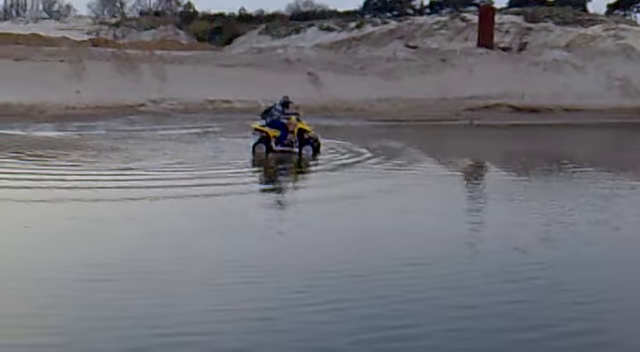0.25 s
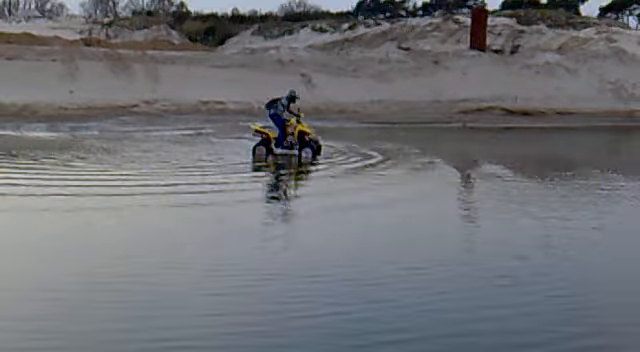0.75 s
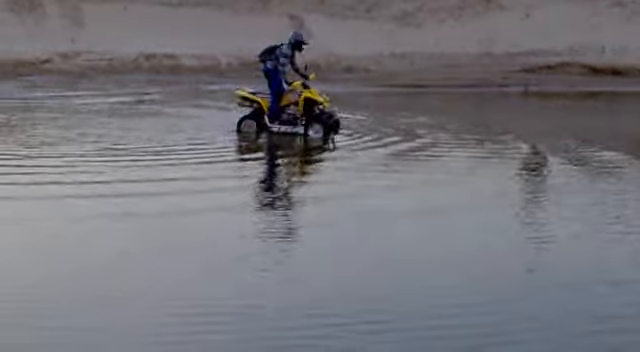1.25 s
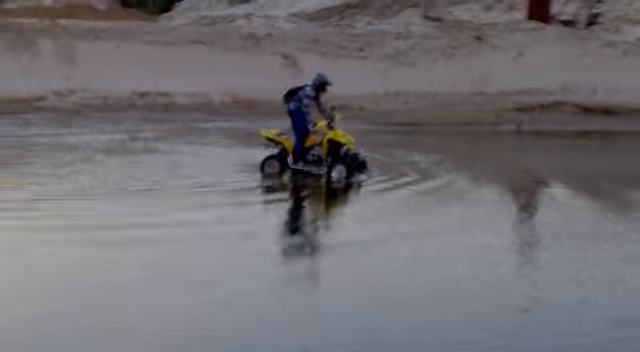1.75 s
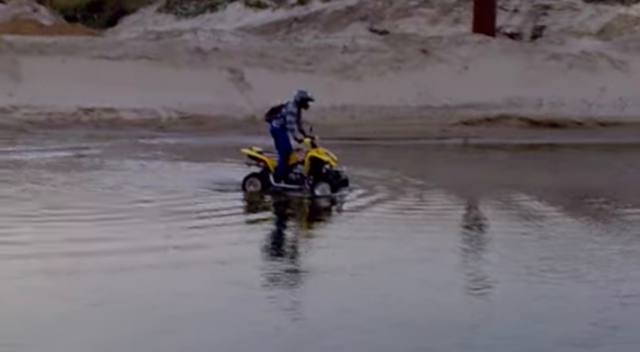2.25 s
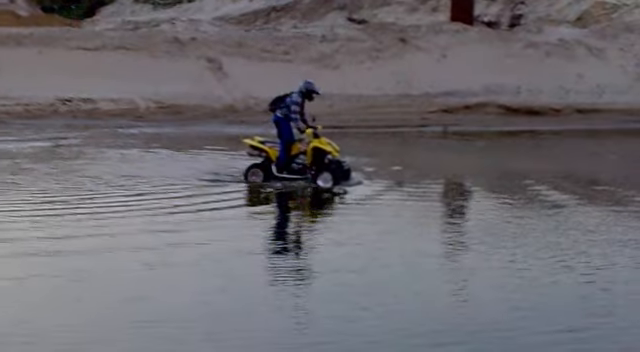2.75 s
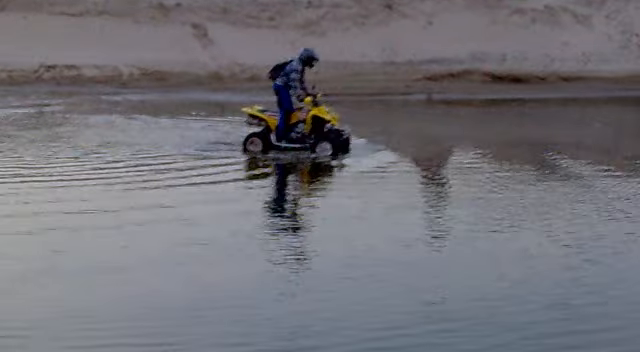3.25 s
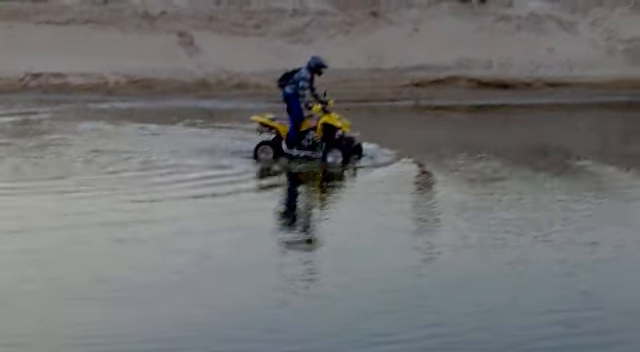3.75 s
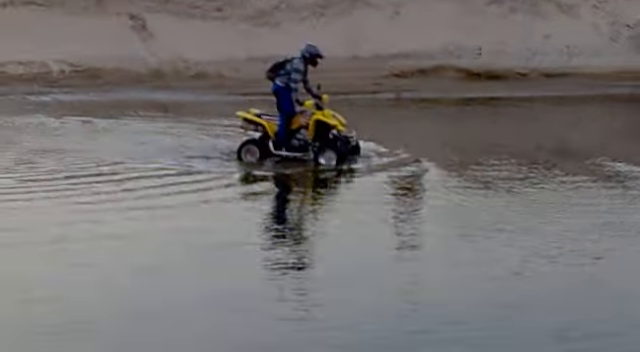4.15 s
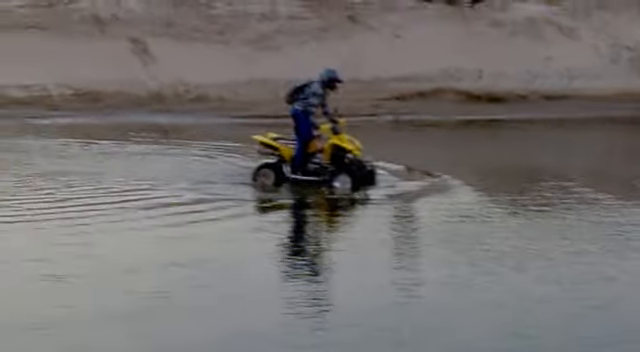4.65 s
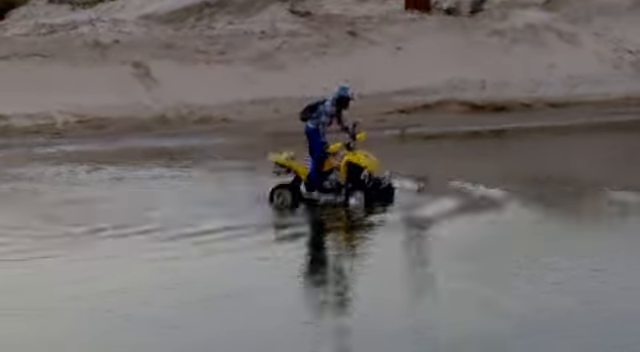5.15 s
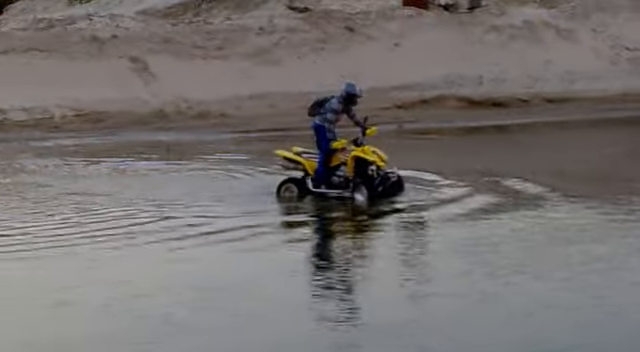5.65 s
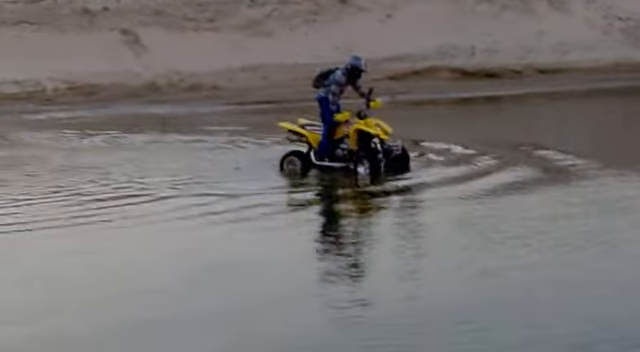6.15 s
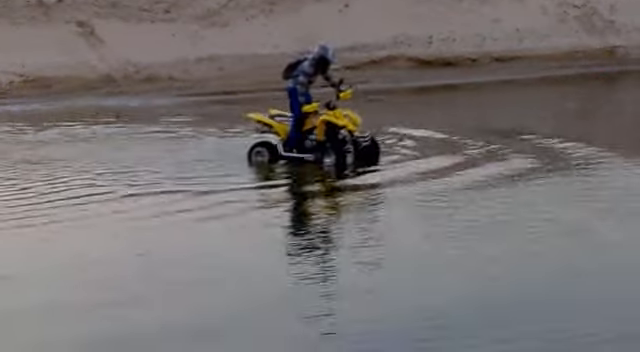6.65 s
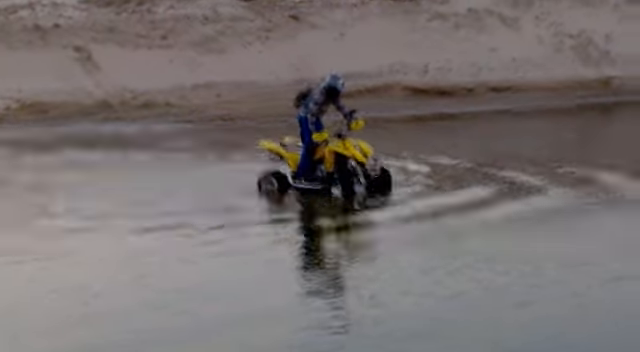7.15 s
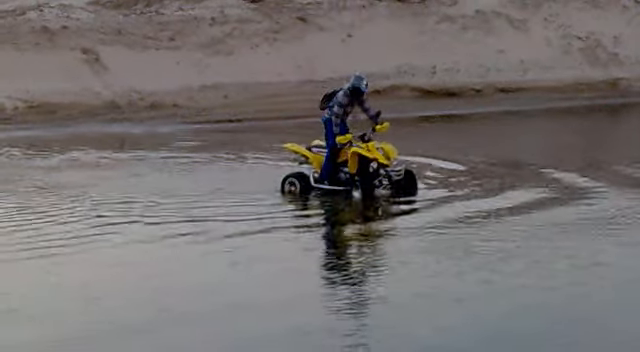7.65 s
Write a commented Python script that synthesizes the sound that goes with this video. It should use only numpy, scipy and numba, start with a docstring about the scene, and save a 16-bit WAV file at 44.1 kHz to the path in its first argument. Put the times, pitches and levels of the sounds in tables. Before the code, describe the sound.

Throaty single-cylinder engine blips swell and fall back to a chugging idle at some distance outdoors, over steady hiss and late overloaded wind buffets.

```python
"""Quad bike in a shallow pond

A single-cylinder four-stroke quad bike idles and blips its throttle some way off across the water.
Each exhaust stroke excites damped modes of the pipe and silencer; shaped noise gives gas and rattle.
Two gliding tones make a small bird; brief pulses are handling ticks and one puff of exhaust gas.
Crackling noise is a rustle close by; steady noise is the hiss of the microphone.
A breeze rumbles on the handheld microphone as low noise; damped swings are the buffets that overload it."""
import sys
import numpy as np
from scipy import signal
from scipy.fft import rfft, irfft
from scipy.io import wavfile
from scipy.ndimage import uniform_filter1d, map_coordinates
from numba import njit

SR = 44100
rng = np.random.default_rng(int(sys.argv[2]) if len(sys.argv) > 2 else 0)


def wav_record(signal):
    """Record a signal, one row per channel, as 16-bit PCM in the file named by sys.argv[1]."""
    frames = np.transpose(np.atleast_2d(signal))
    bounded = np.clip(frames, -1, 1)
    # unit amplitude maps onto the largest positive 16-bit level
    quanta = np.round(bounded * 32767).astype(np.int16)
    wavfile.write(sys.argv[1], SR, quanta)


def invert_db(level):
    """Linear amplitude ratio for a level in decibels (20 dB per decade), elementwise."""
    return 10 ** (np.asarray(level, dtype=float) / 20)


N = 347508
TIME = np.arange(N) / SR

# steady background hiss of the microphone: (frequency [Hz], relative density [dB])
HISS_SPECTRUM = [(290, -33), (500, -2.5), (648, -2.5), (793, -3.5), (1030, -1.5), (1170, -1.5),
                 (1850, -2.5), (3540, -9.5), (8160, -25), (15600, -22.5)]
# breeze flutter on the microphone: (frequency [Hz], relative density [dB])
FLUTTER_SPECTRUM = [(12, -35), (25, -52), (70, -5.5), (143, 0.5), (210, -9.5), (400, -17.5), (700, -39),
                    (1500, -115)]
# gusts of the breeze: (peak time [s], level [dB], dying time [s])
GUSTS = [(.4, -41, 0.61), (.92, -32.5, 0.088), (1.2, -42, 0.33), (1.85, -30.5, 0.055), (3.4, -39, 0.25),
         (3.7, -42, 0.25), (5.2, -39, 0.058), (5.64, -36, 0.033), (6.04, -46, 0.11), (6.6, -44, 0.091),
         (7.02, -32, 0.071), (7.201, -22.5, 0.27), (7.36, -31.5, 0.073), (7.64, -26, 0.034),
         (7.87, -42, .1)]
# buffets on the membrane: (time [s], strength [dB], swing frequency [Hz])
BUFFETS = [(7.1923, -13.5, 116), (7.2043, -1, 114), (7.212, -7.5, 262), (7.243, -18, 128),
           (7.2672, -3.5, 141), (7.324, -10, 81.4), (7.378, -6.5, 197), (7.389, -4, 108), (7.464, -22, 134),
           (7.5403, -14.5, 113), (7.592, -11.5, 89), (7.6052, -5.5, 120.5), (7.622, -4, 77),
           (7.684, -19, 110)]
# handling ticks, and at 4.24 s a short puff of exhaust gas:
# (time [s], envelope peak [dB], frequency [Hz], decay [s])
TICKS_AND_PUFF = [(1.0105, -21, 1650, 0.00051), (4.2398, -31.5, 2540, 0.0031), (4.888, -25.5, 1610, 0.0015),
                  (4.8914, -30, 890, 0.0013), (4.8931, -18, 2870, 0.00026), (5.669, -34, 6500, .00015),
                  (5.695, -38, 7500, .00015), (6.3875, -38, 6450, 0.00022)]
# a short rustle close by: (time [s], level [dB])
RUSTLE = [(5.6, -93), (5.636, -42), (5.728, -64), (5.74, -80)]
# bird whistles: (time [s], length [s], from [Hz], to [Hz], mean level [dB])
CHIRPS = [(6.258, .042, 6800, 3600, -57), (6.39, .04, 4300, 5600, -59)]
# engine speed: (time [s], firing rate [Hz])
SPEED = [(0.0, 4.292), (0.23, 15.589), (0.49, 19.421), (1.13, 21.76), (1.77, 16.327), (2.22, 14.773),
         (2.42, 8.298), (2.5, 12.259), (2.59, 10.534), (3.16, 13.07), (3.34, 21.281), (3.76, 23.98),
         (3.94, 22.669), (4.44, 11.644), (4.94, 13.652), (5.09, 14.042), (5.52, 11.558), (5.73, 14.025),
         (6.66, 13.469), (7.88, 13.467)]
# engine load: (time [s], blowdown strength [dB], piston sweep trim against it [dB])
LOAD = [(0.01, -31, -8), (0.1, -34, -1), (0.32, -21.5, -2), (0.55, -25, 1), (0.94, -27, 0),
        (1.5, -25.5, -2), (1.9, -25, -3.5), (2.19, -28.5, -3), (2.4, -32, -2), (3.05, -30, 7),
        (3.28, -20, -7), (3.65, -24, -12), (3.98, -27.5, -7), (4.06, -27, 0.5), (4.2, -30, -14),
        (4.45, -35, 8), (4.65, -28.5, 5), (5.38, -28, -0.5), (6.2, -26.5, -0.5), (6.5, -28, 0),
        (7.1, -26.5, 5), (7.3, -28.5, 5), (7.88, -29, -1)]
# pipe and silencer modes at idle: (frequency [Hz], 60 dB decay [s], relative level [dB], polarity [signed])
PIPE_MODES = [(56.1, 0.055, 39, 0.85), (115.2, 0.097, 34.5, -0.86), (181.3, 0.056, 19.5, -1.08),
              (267.2, 0.062, 23, -0.83), (368, 0.029, 9, -0.51), (452, 0.044, 14.5, -0.71),
              (640, 0.042, 0, -1.1), (970, .04, 0, -1.2)]
# gas noise: (frequency [Hz], relative density [dB])
GAS_SPECTRUM = [(650, -46), (1100, -9.5), (1410, -10.5), (1860, 3.5), (2260, 0.5), (2670, -4), (2870, -2.5),
                (4320, -7), (10000, -30), (13000, -63), (22000, -120)]
# engine case and silencer shell resonances: (frequency [Hz], width [Hz], relative level [dB])
SHELL_MODES = [(990, 60, 2), (1380, 300, -7.5), (1887, 49, 2), (2800, 26, -6), (3474, 210, -2),
               (5640, 160, -11.5)]
# tail pipe resonances excited by the rushing gas: (frequency [Hz], width [Hz], relative level [dB])
THROAT_MODES = [(652, 160, -7), (890, 74, -4.5), (968, 130, -4), (1500, 440, -13), (2210, 130, -8.5)]
# silencer panel ring, before the rush adds to it: (time [s], level [dB])
PANEL_LEVEL = [(0, -57), (.5, -43), (1.2, -50), (1.8, -56), (2.9, -53.5), (3.8, -54), (5.3, -60),
               (6.3, -64), (6.7, -56.5), (7.25, -44.5), (7.88, -55)]

IDLE_HZ = 14  # firings per second


def curve(table, column=1):
    """Linear interpolation: one column of a table over time."""
    rows = np.array(table, float)
    return np.interp(TIME, rows[:, 0], rows[:, column])


def unit(x):
    """Normalisation: scale to an rms of 1."""
    return x / np.sqrt(np.mean(x ** 2))


def coloured(points, peaks=()):
    """Spectral shaping: white noise weighted by a density curve plus resonance peaks, at rms 1."""
    hz = np.maximum(np.fft.rfftfreq(N, 1 / SR), 1)
    rows = np.array(points, float)
    power = invert_db(np.interp(np.log(hz), np.log(rows[:, 0]), rows[:, 1])) ** 2
    for centre, width, db in peaks:
        power = power + invert_db(db) ** 2 / (1 + (2 * (hz - centre) / width) ** 2) ** 2
    return unit(irfft(rfft(rng.standard_normal(N)) * np.sqrt(power), N))


def walk(rate):
    """Slow random modulation: levels held 1 / rate s, smoothed twice, at rms 1."""
    hold = int(SR / rate)
    steps = np.repeat(rng.standard_normal(N // hold + 1), hold)
    return unit(uniform_filter1d(uniform_filter1d(steps, hold), hold)[:N])


@njit
def ring(x, hz, keep):
    """Damped resonance: a decaying rotating phasor driven by x, whose pitch may move."""
    y, z = np.empty(len(x)), 0j
    for i in range(len(x)):
        z = z * keep * np.exp(2j * np.pi * hz[i] / SR) + x[i]
        y[i] = (1 - keep) * z.imag
    return y


def microphone_hiss():
    """Stationary broadband noise: the steady background hiss of the microphone at -50 dB rms."""
    return invert_db(-50) * coloured(HISS_SPECTRUM)


def breeze_db():
    """Gust envelope: each gust rises fast and dies exponentially over a constant calm level, in dB."""
    calm_db, rise_s = -44, 0.025
    total = invert_db(calm_db)
    for s, db, dying_s in GUSTS:
        decay = np.where(TIME < s, (s - TIME) / rise_s, (TIME - s) / dying_s)
        total = total + invert_db(db) * np.exp(-decay)
    return 20 * np.log10(total)


def wind():
    """Turbulence on a microphone: deep rumble, with flutter and hiss that grow faster than the gusts."""
    deep = coloured([(12, -36), (30, 4.5), (50, 10.5), (85, -6.5), (200, -52)])
    flutter = unit(coloured(FLUTTER_SPECTRUM) * invert_db(2 * walk(35)))
    hiss = invert_db(-36) * coloured([(1000, -14), (4000, 46), (8000, -36), (16000, -32)])
    rumble = deep * invert_db(1.8 * walk(4.16) + breeze_db())
    return rumble + (flutter + hiss) * invert_db(1.314 * breeze_db() + 11)


def buffets():
    """Membrane displacement: a buffet sucks it out, snaps it in and leaves it in damped swings."""
    suck_s, snap_rad, snap_s = 0.0013, 0.71, 0.00083
    swings_to_60_db = 5.6
    out = 0
    for s, db, hz in BUFFETS:
        t = TIME - s
        suck = np.exp(np.minimum(t, 0) / suck_s)
        swing_decay = invert_db(-60 * np.maximum(t, 0) * hz / swings_to_60_db)
        fade = np.where(t < 0, suck, swing_decay)
        # stronger buffets snap further, up to a limit
        snap = snap_rad * min(invert_db(db + 7), 1) * np.tanh(t / snap_s)
        out = out + invert_db(db) * fade * np.sin(2 * np.pi * hz * t + snap)
    return out


def rustle():
    """Amplitude-modulated noise: fast level changes make it crackle close to the microphone."""
    heard = (TIME > RUSTLE[0][0]) & (TIME < RUSTLE[-1][0])
    noise = coloured([(3000, -17), (5500, -18), (8000, -17), (10500, -30)])
    return heard * invert_db(curve(RUSTLE)) * unit(noise * invert_db(1.6 * walk(250)))


def ticks_and_puff():
    """Impulsive excitation: a pulse of tone and noise for each handling tick and the exhaust puff."""
    out = 0
    for s, db, hz, decay in TICKS_AND_PUFF:
        t = np.maximum(TIME - s, 0)
        pulse = t / decay * np.exp(1 - t / decay)
        noise = coloured([(hz / 3, -14), (hz, 0), (hz * 2.5, -20), (SR / 2, -60)])
        out = out + invert_db(db) * pulse * (0.77 * np.sin(2 * np.pi * hz * t) + 0.64 * noise)
    return out


def bird():
    """Linear frequency glide: two thin whistles whose phase is the integral of a moving pitch."""
    out = 0
    for s, length, hz_from, hz_to, db in CHIRPS:
        part = np.clip((TIME - s) / length, 0, 1)
        turns = length * (hz_from * part + (hz_to - hz_from) * part ** 2 / 2)
        out = out + invert_db(db + 7.6 * walk(340)) * np.sin(np.pi * part) * np.sin(2 * np.pi * turns)
    return out


def bank_return(bike):
    """Diffuse reflection: the sand banks send the engine back late and faint, as decaying noise taps."""
    t = TIME[:SR // 4]
    tail = rng.standard_normal(SR // 4) * invert_db(-60 * t / 0.11) * (t > .02)
    return invert_db(-18) * signal.fftconvolve(bike, tail / np.linalg.norm(tail))[:N]


def firing_cycle(hz):
    """Phase integration: share of the cycle, seconds since the valve opened, chance draws per cycle."""
    start_cycle, valve_lag_s = .3764, .0016
    cycles = start_cycle + np.cumsum(hz) / SR - hz * valve_lag_s
    count, share = cycles.astype(int), cycles % 1
    chance = rng.standard_normal((count.max() + 1, 3))[count].T
    return share, share / hz, chance


def exhaust_flow(hz, share, since, chance):
    """Gas discharge: the valve opens to a sharp blowdown, then the piston sweeps the rest out."""
    blow_s, outlet_hz, scatter_db = .0006, 124, 1.2
    # the valve snaps open a little faster at speed
    opening = since / blow_s * (hz / IDLE_HZ) ** .25
    blowdown = opening * np.exp(1 - opening)
    # the sweep takes a fixed part of the cycle and pushes harder at speed
    stroke = np.clip((share - .143) / .284, 0, 1)
    push = .193 * (hz / IDLE_HZ) ** 2.48 * (1 + .08 * chance[1]) * invert_db(curve(LOAD, column=2))
    sweep = push * np.sin(np.pi * stroke ** .396) ** 4
    flow = invert_db(curve(LOAD) + scatter_db * chance[0]) * (blowdown + sweep)
    # a small outlet radiates little bass
    return signal.sosfilt(signal.butter(2, outlet_hz, "high", fs=SR, output="sos"), flow)


def pipe_ring(flow, hz):
    """Pipe resonance and wave steepening: the flow rings every mode, and crests outrun troughs."""
    steepen_ms = 2.0  # advance per unit of pressure
    # hotter gas carries sound faster and lifts every mode
    warm = (hz / IDLE_HZ) ** .12
    pipe = 0
    for mode_hz, t60, db, sign in PIPE_MODES:
        keep = np.exp(-np.log(1000) / (t60 * SR))
        pipe = pipe + sign * invert_db(db) * ring(flow, mode_hz * warm, keep)
    return map_coordinates(pipe, [np.arange(N) + steepen_ms * SR / 1000 * pipe], order=1)


def gas_rush(since, pipe, chance):
    """Jet envelope: gas rushes after the valve opens, most on the outward swings of the pipe."""
    delay_s, rise_s, puff_s = .002, 0.00078, 0.026
    late = np.maximum(since - delay_s, 0)
    outward = np.maximum(pipe, 0) / invert_db(curve(LOAD))
    puff = np.minimum(late / rise_s, 1) * np.exp(-(late / puff_s) ** 2)
    return puff * (1 + 0.051 * outward) * invert_db(1.77 * chance[2])


def tail_roar(rush):
    """Flow-excited resonance: the tail pipe turns slowly away, so its roar fades against the blowdown."""
    roar_db, roar_db_per_s = -13, -1.03
    noise = coloured([(100, -60), (9000, -70)], THROAT_MODES)
    return invert_db(curve(LOAD) + roar_db + roar_db_per_s * TIME) * noise * rush


def gas_and_shell(rush, hz):
    """Jet noise and structural radiation: gas hisses with the rush; the shell rattles all cycle long."""
    gas = invert_db(3) * coloured(GAS_SPECTRUM) * invert_db(1.13 * walk(300)) * (0.66 + 0.91 * rush)
    rattle = coloured([(500, -22), (2000, -10), (9000, -33)], SHELL_MODES)
    shell = invert_db(3) * rattle * invert_db(0.5 * walk(40)) * (0.48 + 0.46 * rush)
    # shared gain [dB] at idle, its slope per dB of blowdown and per doubling of speed
    idle_gain_db, per_blow_db, per_octave_db, idle_blow_db = -51, 0.59, 4, -28
    gain_db = idle_gain_db + per_blow_db * (curve(LOAD) - idle_blow_db)
    gain_db = gain_db + per_octave_db * np.log2(hz / IDLE_HZ)
    # strong gusts add hiss at the overloaded microphone, made here by lifting this noise:
    # 0.68 dB per dB of breeze above -30.5 dB
    gain_db = gain_db + 0.68 * np.maximum(breeze_db() + 30.5, 0)
    return invert_db(gain_db) * (gas + shell)


def panel_ring(rush):
    """Narrow-band resonance: one silencer panel rings through the whole cycle and comes and goes."""
    modes = [(1885, 110, 0), (5580, 58, -20.5)]  # ring and whine: Hz, width Hz, relative dB
    noise = coloured([(100, -70), (9000, -80)], modes)
    return invert_db(curve(PANEL_LEVEL)) * noise * (1 + 0.17 * rush)


def engine():
    """Source and resonator: periodic exhaust flow drives the pipe, and its rush gates the noise sources."""
    hz = curve(SPEED)
    share, since, chance = firing_cycle(hz)
    pipe = pipe_ring(exhaust_flow(hz, share, since, chance), hz)
    rush = gas_rush(since, pipe, chance)
    return pipe + tail_roar(rush) + gas_and_shell(rush, hz) + panel_ring(rush)


def scene():
    """Superposition: the engine and its bank return add to the hiss, wind, short sounds and bird."""
    bike = engine()
    background = microphone_hiss() + wind() + buffets()
    short_sounds = rustle() + ticks_and_puff()
    return (background + short_sounds + bird() + bank_return(bike) + bike)[None]


def band_limit(x):
    """A steep low-pass at the top of the band."""
    return signal.sosfilt(signal.butter(12, 16620, fs=SR, output="sos"), x)


def record(dry):
    """Input saturation and band limiting: peaks are clipped flat, then the top is cut above 15720 Hz."""
    overload = .705  # of full scale
    clipped = np.clip(dry, -overload, overload)
    top_cut = signal.ellip(10, .2, 70, 15720, fs=SR, output="sos")
    mix = signal.sosfilt(top_cut, clipped)
    return band_limit(mix)


dry = scene()
out = record(dry)
wav_record(out)
```